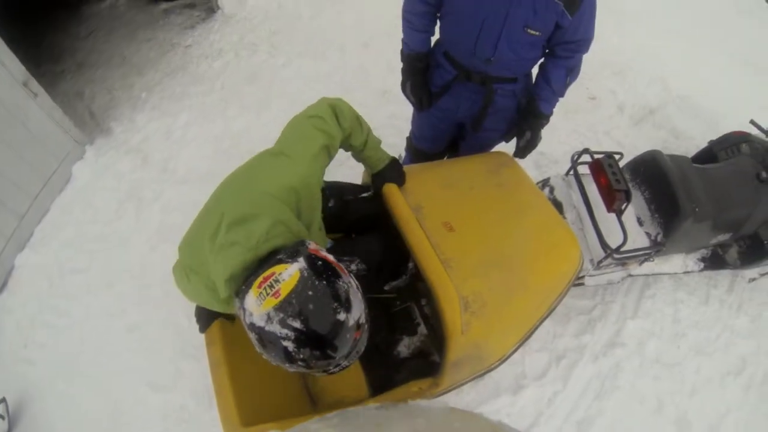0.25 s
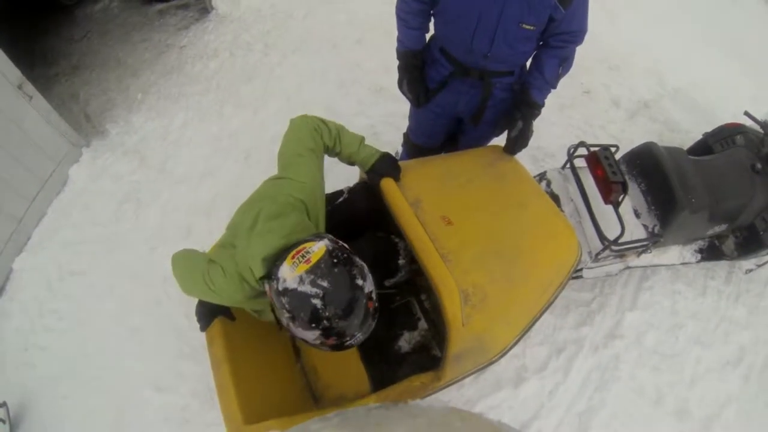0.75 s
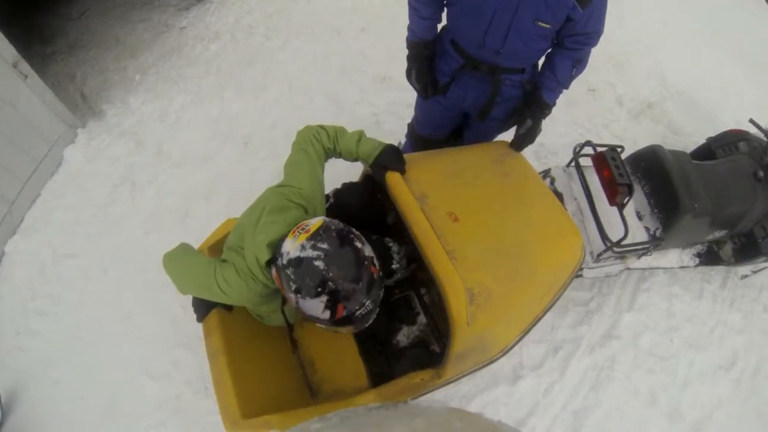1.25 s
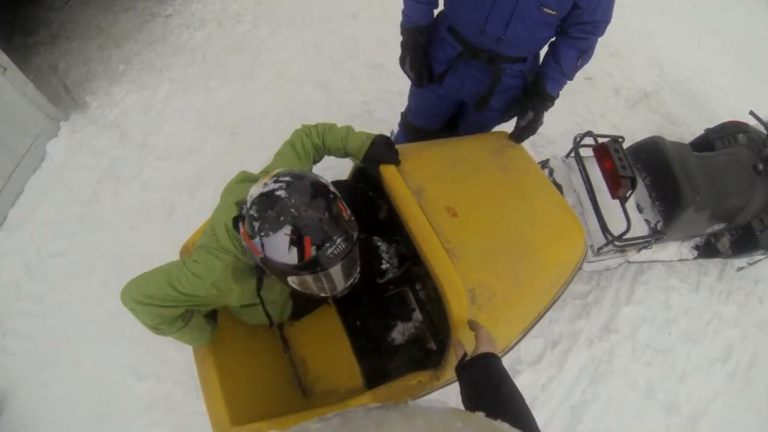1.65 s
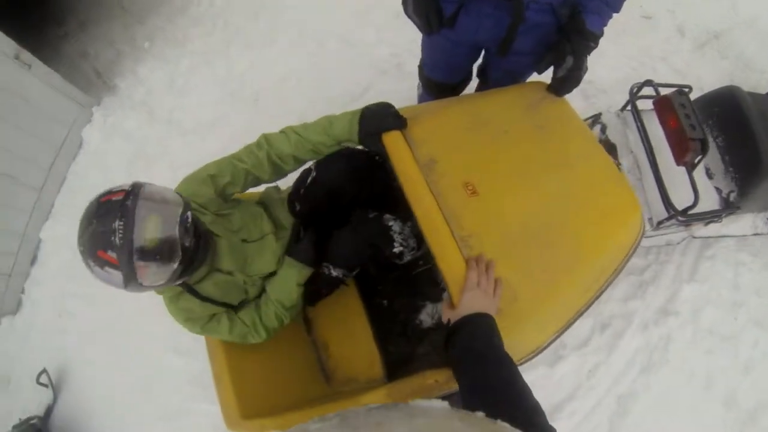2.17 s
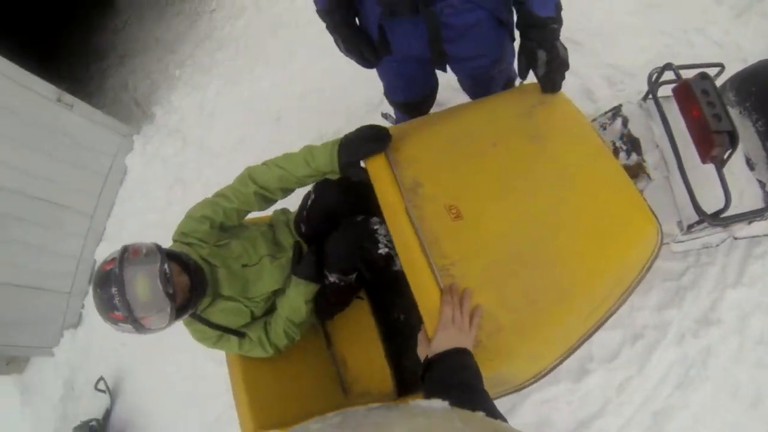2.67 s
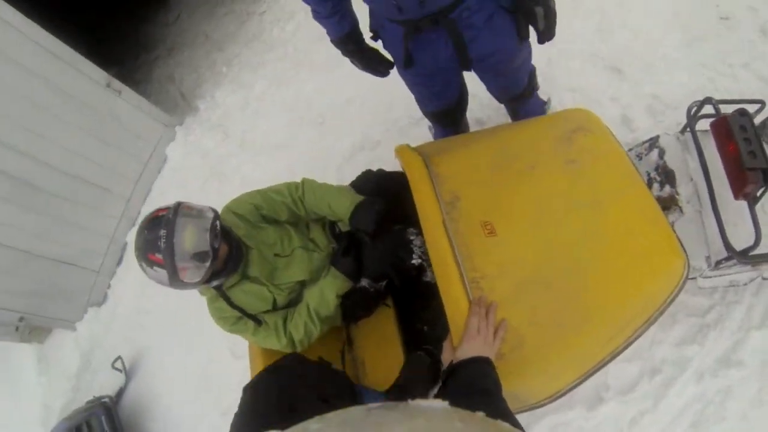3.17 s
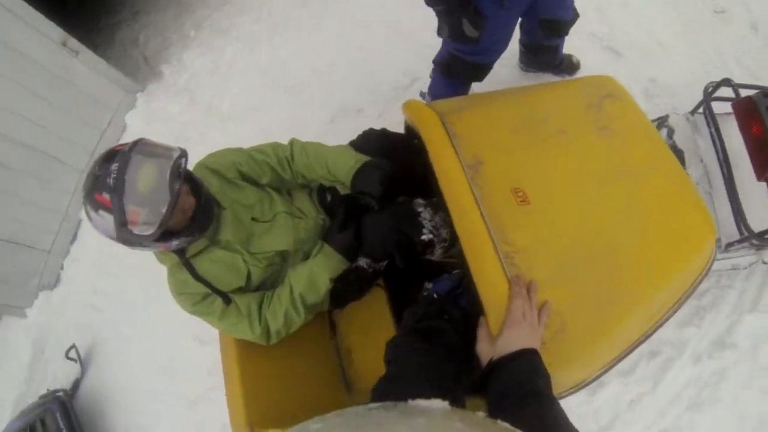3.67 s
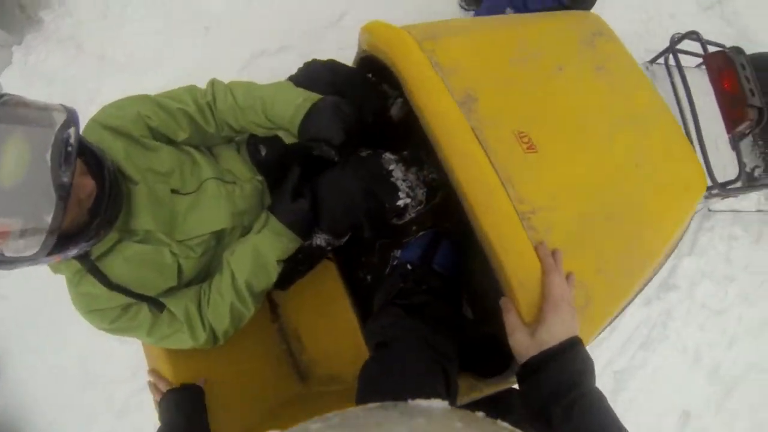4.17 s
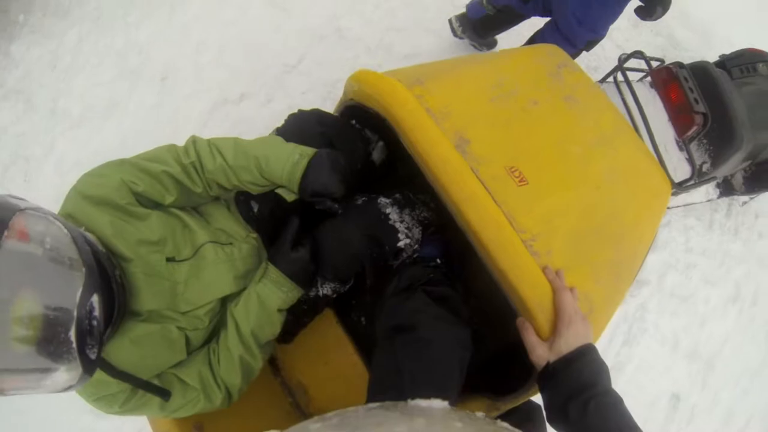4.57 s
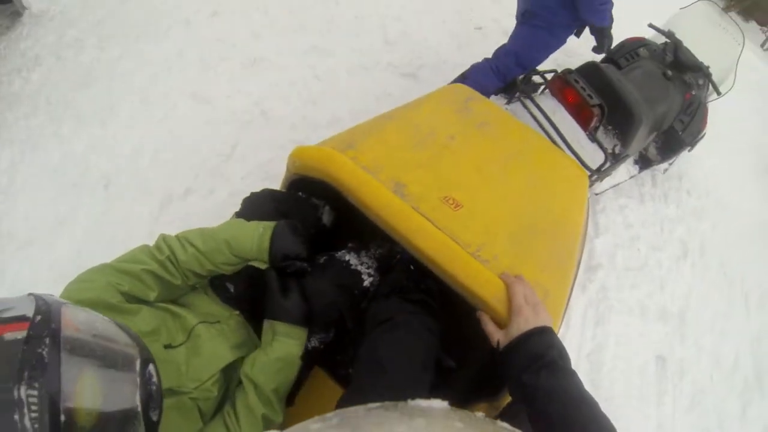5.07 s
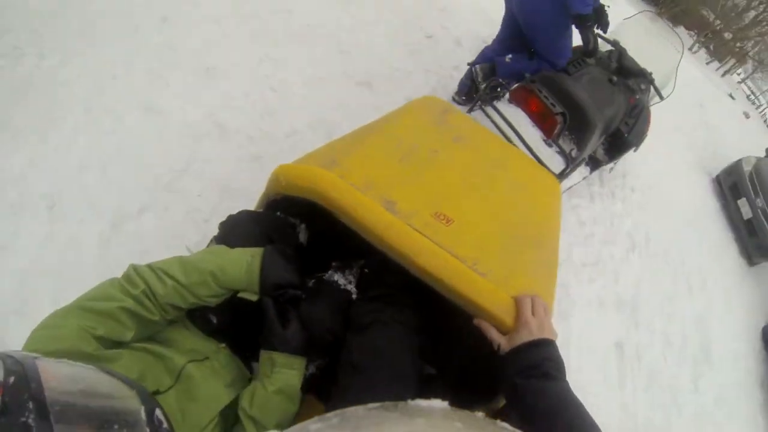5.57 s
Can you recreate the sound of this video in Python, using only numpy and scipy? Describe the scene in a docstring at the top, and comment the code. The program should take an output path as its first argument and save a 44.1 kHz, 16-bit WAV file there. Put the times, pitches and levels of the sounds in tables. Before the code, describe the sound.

A two-stroke snowmobile idles close by with an uneven, loping putter, metallic rattle and low drone, while a hollow plastic knock sounds once.

```python
"""A two-stroke snowmobile idles on snow, a sled's length from a body-worn camera, over a steady drone.
From the start every stroke pumps a soft chuff through the muffler and rattles metal; a thin whine comes and goes.
Only about one stroke in three fires, an uneven, loping putter: each firing thumps, rasps, claps and spits
at the pipe and shakes the engine and its panels. Clothing clicks and swishes, the sled's plastic shell knocks
once near 2 s, and a deep rumble swells near 4.3 s as the wearer steps into the sled."""
import sys
import numpy as np
from scipy import signal
from scipy.io import wavfile
from scipy.ndimage import uniform_filter1d

SR = 44100
rng = np.random.default_rng(int(sys.argv[2]) if len(sys.argv) > 2 else 0)


def wrap_up_sound(samples):
    """Save the sound to the file named by the first command line argument, as 16-bit audio."""
    columns = np.atleast_2d(samples).T
    # keep every value between -1 and 1, then stretch to whole-number steps
    tamed = np.clip(columns, -1, 1)
    steps = np.round(tamed * 32767).astype(np.int16)
    wavfile.write(sys.argv[1], SR, steps)


N = 257103
TIME = np.arange(N) / SR  # seconds

# Colour of gas rushing out of the pipe: pitch_hz [Hz], level_db [dB]
RASP_COLOUR = [(120, -12.5), (190, -4), (225, 11), (265, -1.5), (320, -7), (420, -7), (510, 1), (620, 1.5),
               (760, 1), (900, -5), (1050, -11.5), (1200, -21), (2500, -29), (10000, -86.5)]


def amp(db):
    """Turn decibels into a plain multiplier."""
    return 10 ** (np.asarray(db) / 20)


def evened(x):
    """Scale a sound to an average (RMS) strength of one."""
    return x / np.sqrt(np.mean(x ** 2) + 1e-20)


def colour(x, points, size=8192):
    """Filter to a given spectrum without looking ahead: it rings after a blow, never before."""
    hz, db = np.transpose(points)
    bin_hz = abs(np.fft.fftfreq(size, 1 / SR)) + 1
    log_gain = np.log(amp(np.interp(np.log(bin_hz), np.log(hz), db)))
    # this phase packs the filter's energy as early as it can be (minimum phase)
    taps = np.fft.ifft(np.exp(np.conj(signal.hilbert(log_gain)))).real
    fade = signal.windows.hann(size)[size // 2:]
    return signal.oaconvolve(x, taps[:size // 2] * fade)[:N]


def resonate(x, hz, width):
    """One resonance: a narrower width [Hz] rings longer."""
    r = np.exp(-np.pi * width / SR)
    return signal.lfilter([1, 0, -1], [1, -2 * r * np.cos(2 * np.pi * hz / SR), r * r], x)


def pulses(times, sizes):
    """Single pushes, each shared between two samples to land at its exact time."""
    at = times * SR
    inside = (at >= 0) & (at < N - 1)
    whole = at[inside].astype(int)
    part = at[inside] % 1
    out = np.zeros(N)
    out[whole] += sizes[inside] * (1 - part)
    out[whole + 1] += sizes[inside] * part
    return out


def bursts(times, sizes, rise, decay):
    """An envelope that swells and dies after each push; rise and decay in seconds."""
    t = TIME[:SR // 4]
    shape = (1 - np.exp(-(t / rise) ** 2)) * np.exp(-t / decay)
    return signal.oaconvolve(pulses(times, sizes), shape / shape.max())[:N]


def uneven(times, spread_db):
    """A random size for each push, within bounds."""
    chance = np.clip(rng.standard_normal(len(times)), -1.7, 1.7)
    return amp(spread_db * chance)


def swell(middle, half):
    """A smooth rise and fall around a middle time; both in seconds."""
    return np.exp(-((TIME - middle) / half) ** 2)


def facing(share):
    """Gain as the camera turns to and from the engine; low sounds feel only a share of it."""
    # how openly the engine faces the moving camera: time_s [s], level_db [dB, before centring and share]
    openness = [(0, 2), (1.0, 1), (2.9, 5), (3.6, 4.5), (4.3, 1), (5.1, 0.5), (5.8, -1.5)]
    db = np.interp(TIME, *np.transpose(openness))
    return amp(share * (db - db.mean()))


def hood(x, t60, wet_db):
    """Dense short echoes under the hood, falling 60 dB in t60 seconds."""
    t = TIME[:SR // 8]
    echoes = rng.standard_normal(len(t)) * amp(-60 * t / t60)
    return x + amp(wet_db) * signal.oaconvolve(x, echoes / np.linalg.norm(echoes))[:N]


def drone():
    """Blurred engine noise, and the rumble of the carried camera, swelling at the step into the sled."""
    # steady drone under the beats: pitch_hz [Hz], level_db [dB]
    drone_colour = [(8, -9), (22, -12.5), (75, -4.5), (120, -1.5), (165, -2), (195, -13.5), (300, -16.5),
                    (700, -24), (1200, -34.5), (2000, -36), (4000, -45), (6500, -61), (9500, -70),
                    (14000, -90.5)]
    # rumble of the carried camera: pitch_hz [Hz], level_db [dB]
    rumble_colour = [(6, -29), (20, -2), (40, -8.5), (70, 1), (130, -23), (400, -41), (3000, -100)]
    carry_db, step_db = -40, -27
    steady = amp(-28.5) * evened(colour(rng.standard_normal(N), drone_colour))
    rumble = evened(colour(rng.standard_normal(N), rumble_colour))
    handling = amp(carry_db) + amp(step_db) * swell(middle=4.3, half=0.38)
    return steady + handling * rumble


def firings():
    """Times and sizes of thump, spit, rattle and clap: each putt fires once, or again on the next stroke."""
    # the putts: start_s [s], strength_db [dB], second firing against the first again_db [dB, -60 for none],
    # clap_db [dB], rattle_db [dB], spit_db [dB]
    putts = [(0.1009, -2.5, 1.0, 0.5, -2.0, -1.0), (0.1779, -3.0, -60.0, 2.0, 0.5, -3.0),
             (0.2357, 0.0, -0.5, 1.5, 5.5, 1.0), (0.3314, -3.0, -60.0, -1.5, -5.0, -6.0),
             (0.3904, 0.5, -0.5, 2.5, 3.5, 2.5), (0.4869, -1.5, -60.0, 0.0, -1.5, -4.0),
             (0.5459, 0.0, -6.0, 3.5, 1.5, 6.0), (0.6046, -1.5, -60.0, 1.0, 4.0, -4.0),
             (0.6833, -3.5, 4.0, -2.5, -7.5, -1.0), (0.7624, -1.5, -60.0, -0.5, -2.0, -3.5),
             (0.8212, 0.0, -9.0, 2.0, 4.0, 4.0), (0.8785, -2.5, -60.0, -1.5, 4.5, -3.0),
             (0.9928, -1.0, 2.5, 1.5, 0.0, -0.5), (1.1056, -3.0, -60.0, 0.5, 0.5, -2.5),
             (1.1819, -6.0, 7.5, -4.5, -7.5, -3.5), (1.3344, -5.0, -60.0, 1.5, 3.0, -4.5),
             (1.3912, -0.5, -60.0, -3.0, -0.5, 0.5), (1.4474, -0.5, -60.0, 1.5, 5.0, 0.5),
             (1.5603, -1.0, 3.0, 1.5, 3.5, 2.5), (1.637, -6.0, -60.0, -2.0, -4.0, -5.0),
             (1.7093, -2.5, -60.0, 1.5, -5.0, -3.5), (1.7671, 0.5, -1.5, 0.0, 3.5, 2.5),
             (1.8977, -2.5, -60.0, -1.0, -5.0, -3.5), (1.9545, 0.5, -60.0, -0.5, 4.0, 2.0),
             (2.0102, -0.5, -60.0, 1.0, 2.5, 1.0), (2.123, -0.5, 1.0, 3.0, 2.0, -1.0),
             (2.1983, 0.5, -60.0, 1.5, -0.5, 1.5), (2.2942, 2.0, -1.5, 1.5, 4.0, 2.5),
             (2.4261, -4.0, 6.5, -3.0, -5.5, -5.0), (2.502, 0.5, -60.0, 0.5, 3.0, 1.5),
             (2.617, 2.0, 1.0, 1.5, 1.0, 0.0), (2.6919, -6.5, -60.0, -4.5, -5.0, -6.0),
             (2.7296, -1.0, -60.0, -4.5, -1.5, -6.0), (2.7868, -2.0, -60.0, -4.5, -5.0, -1.0),
             (2.8443, 2.0, -60.0, -1.0, 4.5, 0.0), (2.9012, 2.5, -60.0, 0.5, 3.5, 2.5),
             (2.9574, 0.5, -60.0, -0.5, 3.0, -1.5), (3.0517, -0.5, 2.0, -2.5, -1.0, -5.0),
             (3.1651, 1.5, -0.5, 0.5, -1.0, 5.5), (3.2567, -6.5, -60.0, -4.5, -4.0, -6.0),
             (3.295, 0.0, 1.0, -1.5, -0.5, 0.0), (3.3682, -9.5, -60.0, -4.5, -5.0, -6.0),
             (3.4064, -1.0, -60.0, -3.0, -3.0, -3.0), (3.4627, 2.0, -60.0, 2.5, -4.5, 4.0),
             (3.5195, 0.0, -60.0, 0.0, 4.0, 4.0), (3.6117, 1.5, 0.5, -1.0, 0.5, 2.0),
             (3.7029, -10.0, -60.0, -4.5, -5.0, -6.0), (3.7421, 1.0, -5.5, 0.0, 2.0, 0.5),
             (3.7982, -1.5, -60.0, -1.5, -0.5, -1.5), (3.872, -4.0, -60.0, -1.0, -3.0, -3.0),
             (3.926, -1.0, -60.0, -2.0, 2.0, 0.0), (3.9822, -1.0, -60.0, 0.5, -5.0, 2.5),
             (4.039, 0.5, -60.0, -2.0, 3.0, 4.0), (4.132, -1.0, 1.5, -1.5, 1.5, 1.0),
             (4.2457, 0.0, -0.5, 2.0, 3.0, 1.5), (4.341, -6.0, -60.0, 0.0, -2.0, -4.0),
             (4.3978, 1.0, -1.0, -0.5, 5.5, 3.5), (4.4915, -0.5, -60.0, 0.5, -1.0, -3.5),
             (4.5487, -7.0, -60.0, -4.5, -5.0, -6.0), (4.6057, -2.5, -60.0, -2.0, 3.5, -0.5),
             (4.6818, -3.5, -60.0, -1.5, -5.0, -6.0), (4.74, 0.0, -0.5, -0.5, 4.5, 1.5),
             (4.8725, -2.0, -60.0, 0.0, 3.0, -1.5), (4.9292, 0.5, -6.0, -1.0, -0.5, 4.5),
             (4.9842, -2.0, -60.0, 0.0, 2.0, -2.5), (5.0957, 0.0, 0.5, 0.0, 1.5, 1.5),
             (5.17, -5.0, -60.0, -1.0, -2.0, -2.0), (5.2423, -3.0, -60.0, 0.0, 0.0, -1.0),
             (5.2983, 1.0, -60.0, 1.0, 2.0, 3.0), (5.354, 0.0, -60.0, 2.0, 5.0, 3.0),
             (5.4275, -3.5, -60.0, -4.5, -5.0, -6.0), (5.4842, -0.5, -1.0, 0.0, -1.0, 0.5),
             (5.5776, -10.0, -60.0, -4.5, -5.0, -6.0), (5.6169, -3.0, 4.0, -1.0, -1.0, -1.0),
             (5.7871, 1.0, -60.0, 3.0, -0.5, 1.5)]
    second_after_s = 0.019
    rows = []
    for s, db, again_db, clap_db, rattle_db, spit_db in putts:
        sizes = amp([db, spit_db, rattle_db, clap_db])
        rows.append((s, *sizes))
        rows.append((s + second_after_s, *(sizes * amp(again_db))))
    return np.transpose(rows)


def strokes(fired, count=6):
    """A whole number of strokes fits between two firings; the crank runs on before and after."""
    strokes_per_s = 52.7
    number = np.r_[0, np.cumsum(np.round(np.diff(fired) * strokes_per_s))]
    between = np.interp(np.arange(number[-1] + 1), number, fired)
    spare = np.arange(1, count + 1) / strokes_per_s
    return np.r_[fired[0] - spare[::-1], between, fired[-1] + spare]


def exhaust(fired, force, turns):
    """Pressure at the pipe: a thump per firing, and a chuff about half a stroke later, firing or not."""
    # the muffler's answer to a firing: pitch_hz [Hz], level_db [dB]
    thump_colour = [(8, -39.5), (25, -5), (50, 5.5), (60, 10.5), (80, 20), (97, 15), (118, 25.5), (146, 12),
                    (168, -0.5), (192, -31), (215, 3), (238, 4), (260, -12.5), (320, -12), (362, -7.5),
                    (420, -22.5), (580, -11), (1000, -41.5), (4000, -99)]
    # the muffler's answer to a plain stroke: pitch_hz [Hz], level_db [dB]
    chuff_colour = [(20, -5), (53, 3), (106, 8), (160, -7), (190, -14), (212, -7.5), (265, -17), (360, -17),
                    (450, -26), (580, -22), (1000, -35), (4000, -90)]
    thump = -colour(pulses(fired - 0.0008, force), thump_colour)
    opens = turns + 0.0088 + 0.00012 * rng.standard_normal(len(turns))  # seconds, slightly irregular
    chuff = colour(pulses(opens, np.ones(len(opens))), chuff_colour)
    thumping = amp(-18.5) * evened(thump) * facing(share=0.3)
    chuffing = amp(-20.0) * evened(chuff) * facing(share=0.65)
    return thumping + chuffing


def nearer(pressure):
    """The deepest part of the exhaust grows a little as the camera moves."""
    # level of the deep bass: time_s [s], level_db [dB]
    bass_level = [(0, 0.5), (3.3, -0.3), (4.3, 4), (5.8, 4.5)]
    bass = signal.sosfiltfilt(signal.butter(3, 80, fs=SR, output="sos"), pressure)
    gain = amp(np.interp(TIME, *np.transpose(bass_level)))
    return pressure + (gain - 1) * bass


def rasp(pressure):
    """Gas turns turbulent on each outward swing of the pressure wave."""
    flow = 2.1 + np.maximum(-evened(pressure), 0)  # outward is negative
    return amp(-36.5) * evened(colour(flow * rng.standard_normal(N), RASP_COLOUR))


def blows(fired, force, turns):
    """The pistons knock nearly alike at every stroke, and hard just after a firing."""
    hard = pulses(fired + 0.00205, force)
    plain = pulses(turns + 0.011, uneven(turns, spread_db=1.5))
    return evened(hard + 0.56 * plain)


def bark(knock):
    """Every blow sets off the same short echoes in the pipe and hood."""
    return amp(-41.0) * evened(colour(hood(knock, t60=0.075, wet_db=10), RASP_COLOUR))


def spit(fired, size):
    """Each firing hisses briefly with a weaker tail, over a steady leak; some are brighter than others."""
    # colour of the spit: pitch_hz [Hz], level_db [dB]
    spit_colour = [(1500, -12), (4000, 2), (5000, 0), (5800, -1), (6600, -10), (7800, -4), (9600, -3.5),
                   (11000, -9.5), (12000, -14.5), (12800, -12), (14200, -22.5), (15200, -23)]
    split_hz = 7500  # border between the dull and the bright part
    leak = 0.31  # steady hiss between firings, as a share of a firing's spit
    out = np.zeros(N)
    bright = uneven(fired, spread_db=1.8)
    for part, side in ((size / bright, "lowpass"), (size * bright, "highpass")):
        jet = bursts(fired - 0.004, part, rise=0.0047, decay=0.013)
        tail = bursts(fired, part, rise=0.0091, decay=0.026)
        band = signal.butter(4, split_hz, side, fs=SR, output="sos")
        noise = signal.sosfilt(band, rng.standard_normal(N))
        out += np.hypot(jet + 0.04 * tail, leak) * noise
    return amp(-55.5) * evened(colour(out, spit_colour))


def shaded(hiss):
    """The top treble comes and goes as the camera turns."""
    # level of the spit's top treble: time_s [s], level_db [dB]
    treble_level = [(0, 2), (1.6, -0.5), (2.4, 1), (3.3, 4.5), (4.3, -1), (5.8, -8)]
    top = signal.oaconvolve(hiss, signal.firwin(31, 10500, pass_zero=False, fs=SR), "same")
    gain = amp(np.interp(TIME, *np.transpose(treble_level)))
    return hiss + (gain - 1) * top


def shaking(fired, rattle, turns):
    """Loose metal chatters about every half stroke, and harder around a firing."""
    cylinder = 1 + 0.31 * (-1) ** np.arange(len(turns))  # one cylinder slaps harder than the other
    slap_size = cylinder * uneven(turns, spread_db=5.5)
    slap = bursts(turns + 0.00019, slap_size, rise=0.00029, decay=0.0078)
    back_size = cylinder * uneven(turns, spread_db=2.0)
    back = bursts(turns + 0.011, back_size, rise=0.0008, decay=0.002)
    jolt = bursts(fired - 0.005, rattle, rise=0.011, decay=0.018)
    return evened(rng.standard_normal(N) * (4 + slap + 2.8 * back) * (2.05 + jolt))


def clatter(shake):
    """The chatter heard through the casing, with echoes under the hood."""
    # colour of the engine's casing: pitch_hz [Hz], level_db [dB]
    casing_colour = [(700, -27.5), (1200, -11), (1380, -3.5), (1480, -2.5), (1680, 3.5), (1950, -1),
                     (2200, -12), (2450, -11.5), (2730, -7), (3020, -20.5), (3300, -18), (3700, -8.5),
                     (4300, -13), (5000, -28.5), (5700, -19.5), (6600, -30.5), (9500, -30.5), (14000, -73)]
    return amp(-40.3) * evened(hood(colour(shake, casing_colour), t60=0.09, wet_db=-8))


def ring(fired, rattle, turns):
    """Rough casing resonances flare late in each stroke and at firings, each best from its own direction."""
    # flaring rings of the casing: pitch_hz [Hz], width_hz [Hz], level_db [dB], loudest_s [s], half_length_s [s]
    casing_rings = [(1740, 380, -41.8, .7, 2.0), (1810, 280, -41.5, 3.2, .75), (1590, 130, -44.5, 4.3, .5)]
    early = bursts(fired - 0.003, rattle, rise=0.003, decay=0.018)
    late = bursts(fired + 0.011, rattle, rise=0.001, decay=0.004)
    plain = bursts(turns + 0.013, uneven(turns, spread_db=2), rise=0.001, decay=0.004)
    flare = 0.15 + early + 1.1 * late + 0.6 * plain
    out = np.zeros(N)
    for hz, width, db, s, half in casing_rings:
        rough = flare * rng.standard_normal(N)
        tone = evened(resonate(resonate(rough, hz, width), hz, width))
        out += amp(db) * swell(s, half) * tone
    return out


def panels(shake, knock):
    """Chatter and blows keep panels and pipe ringing, their levels shifting as the camera passes each one."""
    # ringing panels and pipe: pitch_hz [Hz], width_hz [Hz], level_db [dB, against each other],
    # pass_s [s, camera passes the panel's own direction], extra_db [dB, added there; minus is quieter]
    ringing_parts = [(239.5, 5.2, 7, 0.54, -4), (364.4, 13.2, -1, 4.1, 5), (487, 48, -0.5, 0.92, 5),
                     (569, 33, 0.5, 0.25, 7), (730.8, 18, 0, 0.96, 1), (854.5, 56, -5, 5.08, 7),
                     (1017, 31, -6, 0.71, 1), (1315, 70, -11, 3.3, 3), (1511, 19, -18, 4.3, 10.5),
                     (1790, 93, -22, 6.9, 0), (1980, 16, -16, 2.9, 10), (2690, 160, -17.5, 0.75, 10.5),
                     (3960, 77, -27, 3.2, 8), (3840, 260, -21.5, 2.5, 8)]
    drive = shake + 0.33 * knock
    out = np.zeros(N)
    for hz, width, db, s, extra_db in ringing_parts:
        tone = evened(resonate(resonate(drive, hz, width), hz, width))
        tone = tone * amp(db + extra_db * swell(s, half=1))
        # higher parts are shaded more as the camera turns
        out += tone * facing(share=1.65 if hz > 1200 else 0.11)
    return amp(-44.0) * out


def whine():
    """A thin tone swells and sags in pitch, again and again."""
    # swells of the whine: start_s [s], length_s [s], level_db [dB], first_hz [Hz], last_hz [Hz]
    whine_swells = [(.05, .85, -40.5, 572, 566), (2.42, .3, -39.5, 545, 490), (4.26, .17, -40, 531, 515),
                    (4.41, .22, -38, 536, 521), (4.59, .18, -35.5, 531, 513), (4.74, .16, -40, 539, 517)]
    out = np.zeros(N)
    for s, length, db, first_hz, last_hz in whine_swells:
        along = np.clip((TIME - s) / length, 0, 1)
        waver = evened(uniform_filter1d(rng.standard_normal(N), size=1200))
        hz = first_hz + (last_hz - first_hz) * along + 4 * waver
        tone = evened(np.sin(2 * np.pi * (np.cumsum(hz) / SR + rng.random())))
        out += amp(db) * np.sqrt(4 * along * (1 - along)) * tone
    return out


def claps(fired, size):
    """Each firing claps in the pipe and echoes there: a hard pop with a short gust behind it."""
    # claps of one firing: delay_s [s after it fires], level_db [dB]
    clap_echoes = [(.001, 0), (.0052, -3), (.0102, -3), (.0168, -3), (.0194, -1), (.026, -4)]
    pops, gusts = np.zeros(N), np.zeros(N)
    for delay, db in clap_echoes:
        pops += pulses(fired + delay, size * amp(db))
        gusts += bursts(fired + delay, size * amp(db), rise=0.00071, decay=0.0015)
    hard = amp(-39.5) * evened(colour(pops, RASP_COLOUR))
    breathy = amp(-38.5) * evened(colour(gusts * rng.standard_normal(N), RASP_COLOUR))
    return hard + breathy


def clothing():
    """Brief narrow puffs of noise from nylon and buckles."""
    # clicks and swishes: start_s [s], level_db [dB], pitch_hz [Hz], width_hz [Hz], decay_s [s]
    puffs = [(.546, -52, 9100, 3000, 0.0061), (.703, -53, 7700, 1500, 0.008),
             (3.188, -38.5, 9500, 1000, 0.0047), (3.192, -42.5, 4600, 860, 0.011),
             (5.1288, -26.5, 4400, 1200, 0.0009), (5.1288, -28, 1900, 900, 0.0007),
             (5.1305, -35, 3400, 1000, 0.0016)]
    out = np.zeros(N)
    for s, db, hz, width, decay in puffs:
        noise = evened(resonate(resonate(rng.standard_normal(N), hz, width), hz, width))
        out += noise * bursts(np.array([s]), amp([db]), rise=decay / 2, decay=decay)
    return out


def sled():
    """A hollow knock sets the plastic shell ringing in several fading tones."""
    # tones of the shell: pitch_hz [Hz], level_db [dB, against each other], t60_s [s to fall 60 dB]
    shell_tones = [(146, 6.5, 0.16), (283, -13, 0.4), (469, -0.5, 0.094), (622, -1, 0.12),
                   (680, 7.5, 0.037), (780, 1, 0.035)]
    # knocks on the shell: start_s [s], level_db [dB]
    shell_knocks = [(2.068, -17.5)]
    s, db = np.transpose(shell_knocks)
    t = TIME[:SR // 4]
    shell = sum(amp(level - 60 * t / t60) * np.sin(2 * np.pi * hz * t) for hz, level, t60 in shell_tones)
    soft_start = 1 - np.exp(-t / 0.0024)
    return signal.oaconvolve(pulses(s, amp(db)), shell * soft_start)[:N]


def scene():
    """The idling engine, with the small sounds of boarding the sled."""
    fired, force, jet, rattle, clap = firings()
    turns = strokes(fired)
    pressure = exhaust(fired, force, turns)
    knock = blows(fired, force, turns)
    rough = (rasp(pressure) + bark(knock) + claps(fired, clap)) * facing(share=0.33)
    hiss = shaded(spit(fired, jet)) * facing(share=0.56)
    pipe = nearer(pressure) + rough + hiss
    # casing and panels follow the same beat, but each has its own loose parts
    casing = clatter(shaking(fired, rattle, turns)) * facing(share=1.0) + ring(fired, rattle, turns)
    metal = casing + panels(shaking(fired, rattle, turns), knock)
    return (pipe + metal + whine() + drone() + sled() + clothing())[None]


def record(dry):
    """The microphone passes no steady pressure; then the sound is cut above its top edge."""
    edge_hz = 15200
    sound = signal.lfilter(*signal.butter(1, 5, "highpass", fs=SR), dry)
    low_pass = signal.firwin(511, edge_hz, window=("kaiser", 9), fs=SR)
    return signal.oaconvolve(sound, low_pass[None], "same")


dry = scene()
out = record(dry)
wrap_up_sound(out)
```